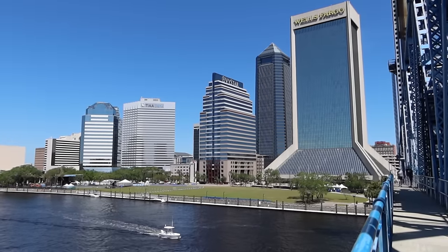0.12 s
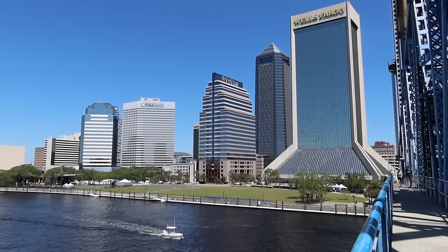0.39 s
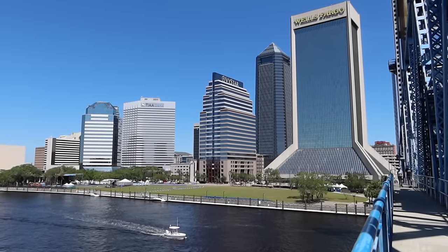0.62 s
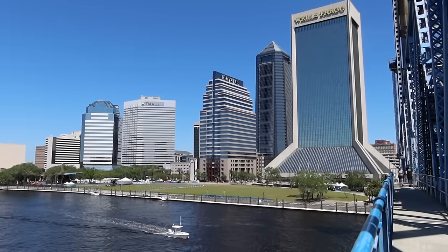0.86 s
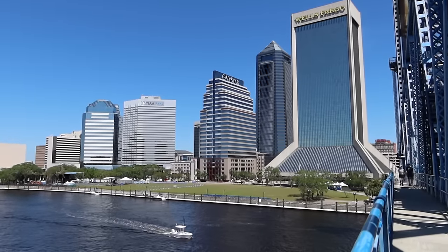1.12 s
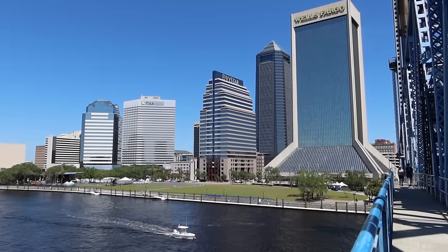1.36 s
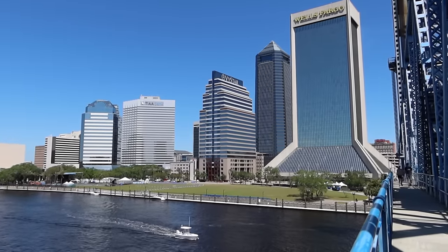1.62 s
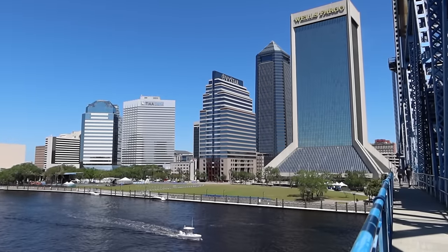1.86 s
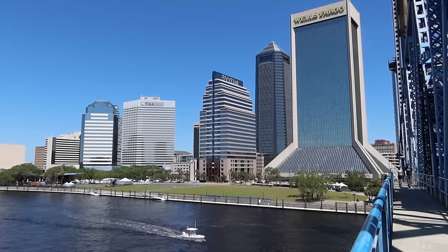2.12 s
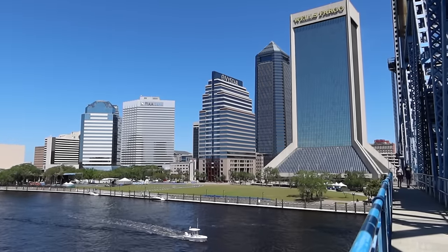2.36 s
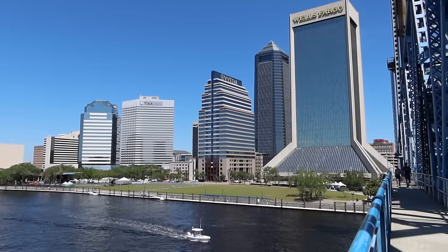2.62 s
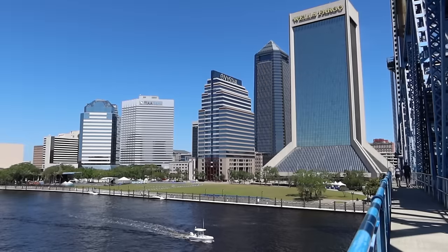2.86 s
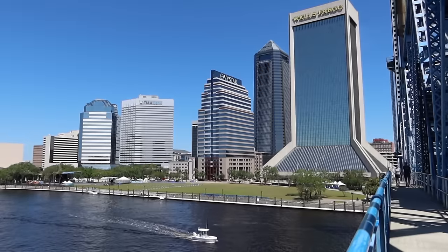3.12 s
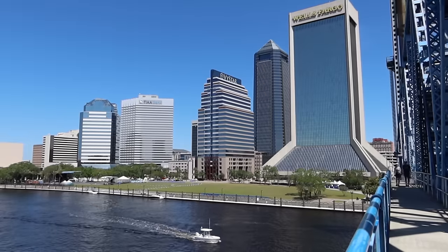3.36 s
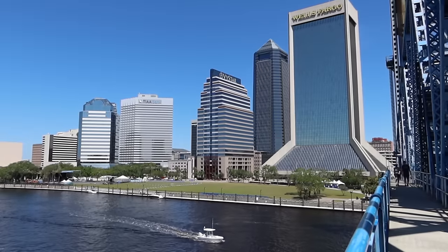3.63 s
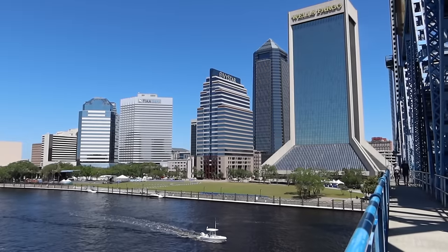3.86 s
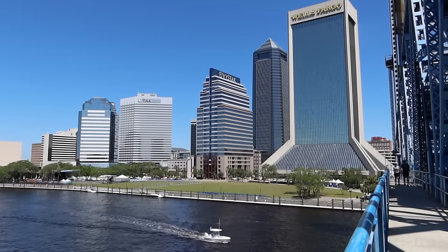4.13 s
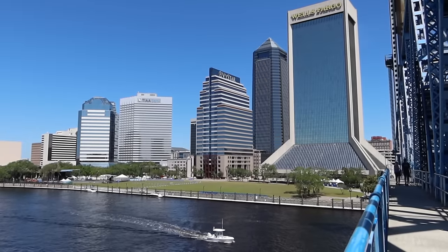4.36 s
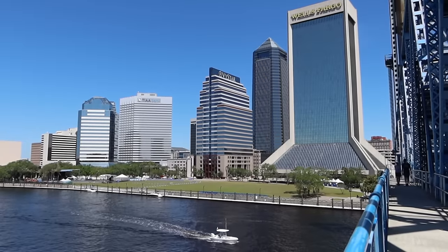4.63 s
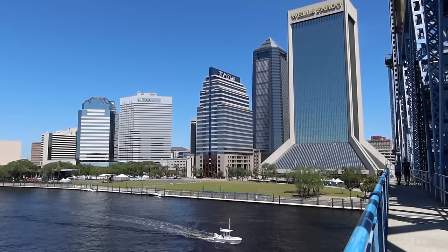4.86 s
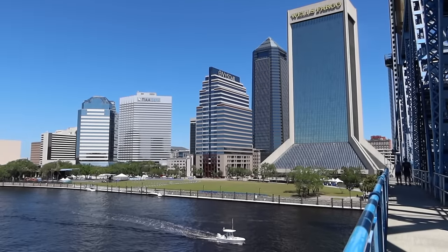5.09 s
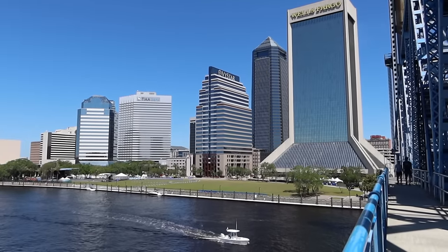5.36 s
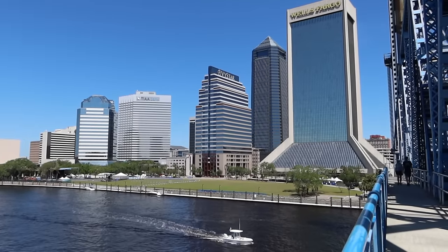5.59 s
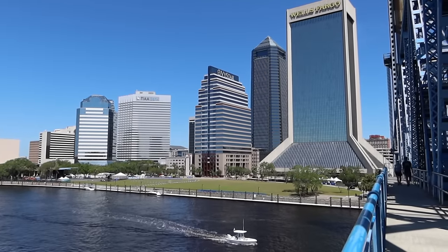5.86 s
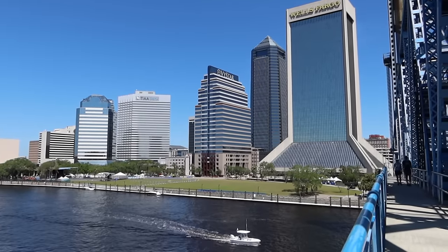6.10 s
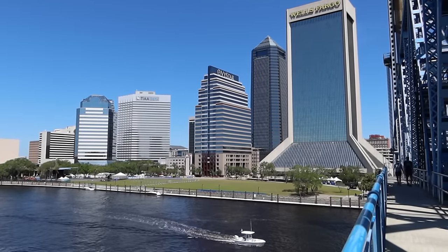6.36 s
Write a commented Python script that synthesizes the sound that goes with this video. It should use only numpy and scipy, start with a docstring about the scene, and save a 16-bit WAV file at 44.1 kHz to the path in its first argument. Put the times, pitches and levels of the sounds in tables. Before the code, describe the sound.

Blurred, beating low hum of tyres on a steel-grated bridge deck, surging and wavering over a dull boom, growl and soft road hiss.

```python
"""A blurred, beating hum stands out throughout, its strength rising and falling: traffic on the
steel grating of a river bridge, heard from the walkway.
Tyres crossing the bars sound multiples of the bar rate, as pairs of wavering tones.
Under the hum the deck booms, growls and roars, made of noise shaped in frequency and level.
Tread noise and hiss lie on top and, with the roar, swell as vehicles come near the microphone.
Brief hums at other pitches and two puffs of whistling hiss pass through."""
import sys
import numpy as np
from scipy import signal
from scipy.fft import rfft, irfft, next_fast_len
from scipy.io import wavfile
from scipy.ndimage import uniform_filter1d, map_coordinates

SR = 44100
rng = np.random.default_rng(int(sys.argv[2]) if len(sys.argv) > 2 else 0)


def unload_wav(signal):
    """Save mono or channel-first audio to the path in sys.argv[1] as 16-bit WAV at rate SR, clipped to [-1, 1]."""
    wavfile.write(
        sys.argv[1],
        SR,
        np.round(np.clip(np.atleast_2d(signal).T, -1, 1) * 32767).astype(np.int16),
    )


def to_linear_factor(level_db):
    """Convert decibel levels (scalar or array-like) to linear amplitude factors."""
    exponent = np.asarray(level_db, float) / 20
    return 10 ** exponent


N = 285768  # samples, 6.48 s


def unit(x):
    """Scales a signal to rms 1."""
    return x / np.sqrt(np.mean(x ** 2) + 1e-20)


def curves(rows):
    """Draws straight lines through the rows: one curve for each column after the time."""
    seconds, *columns = np.transpose(rows)
    t = np.arange(N) / SR
    return [np.interp(t, seconds, column) for column in columns]


def wobble(rate):
    """A smooth random curve through `rate` random knots a second."""
    knots = rng.standard_normal(int(N * rate / SR) + 4)
    return map_coordinates(knots, [np.arange(N) * rate / SR])


def rush(spectrum, patchy_db):
    """Noise of rms 1, coloured by the spectrum, whose gain varies in patches of time and frequency."""
    cells = signal.stft(rng.standard_normal(N + 1024), nperseg=1024)[2]
    patches = rng.standard_normal(cells.shape)
    patches = uniform_filter1d(patches, size=5, axis=0)  # along frequency
    patches = uniform_filter1d(patches, size=8, axis=1)  # along time
    patch_gain = to_linear_factor(patchy_db * unit(patches))
    noise = signal.istft(cells * patch_gain, nperseg=1024)[1][:N]

    length = next_fast_len(N + 8192)
    hz, db = np.transpose(spectrum)
    log_bins = np.log(np.fft.rfftfreq(length, 1 / SR) + 1)
    colour = to_linear_factor(np.interp(log_bins, np.log(hz + 1), db, -120, -120))  # near silence outside the rows
    return unit(irfft(rfft(noise, length) * colour, length)[:N])


def fuzzy(hz, spread_hz, flutter_db):
    """A tone of rms 1 from two axles that cross the bars out of step, so it blurs and beats."""
    axles = []
    for _ in range(2):
        level = to_linear_factor(flutter_db * wobble(18))
        cycles = np.cumsum(hz + spread_hz * wobble(12)) / SR
        axles.append(level * np.sin(2 * np.pi * cycles + rng.uniform(0, 2 * np.pi)))
    return unit(axles[0] + 0.38 * axles[1])


# The finest hiss, over the whole place. Each row: time in seconds, level in dB.
FINE_HISS_LEVEL = [(0, -72), (.6, -74), (1.3, -71), (2.35, -71), (2.8, -74), (3.8, -77.5), (4.5, -74),
                   (5, -74.5), (5.6, -72.5), (6, -70), (6.25, -67.5), (6.48, -65)]
# Its colour. Each row: frequency in Hz, relative density in dB per Hz.
FINE_HISS_COLOUR = [(5000, -23), (7000, -0.5), (8200, -5), (9500, -7.5), (11000, -11.5), (14500, -20.5),
                    (16000, -68)]


def fine_hiss():
    """The highest part of the traffic noise, patchy noise on a slowly moving level."""
    level_db, = curves(FINE_HISS_LEVEL)
    return to_linear_factor(level_db) * rush(FINE_HISS_COLOUR, patchy_db=3.0)


# The deck's own resonance. Each row: frequency in Hz, relative density in dB per Hz.
DECK_RING_COLOUR = [(140, -29.5), (158, -4), (166, 0), (175, -3.5), (195, -30.5)]


def deck_ring():
    """A resonance of the deck that rings throughout, as a narrow band of noise."""
    return to_linear_factor(-32) * rush(DECK_RING_COLOUR, patchy_db=0.5)


# The steel underfoot. Each row: time in seconds, boom level in dB, growl level in dB.
BOOM_GROWL_LEVEL = [(0, -25.5, -26), (.4, -25, -24.5), (1.0, -26.5, -26), (1.2, -24, -26),
                    (1.45, -21.5, -23.5), (1.8, -24.5, -23), (2.3, -22.5, -23), (3.0, -23, -25.5),
                    (3.3, -25, -26), (3.7, -25.5, -26.5), (4.5, -24.5, -30), (5.0, -24.5, -31.5),
                    (5.8, -25, -34.5), (6.0, -23, -29.5), (6.25, -25.5, -30), (6.48, -19.5, -26)]
# Level of the upper growl. Each row: time in seconds, level in dB.
UPPER_GROWL_LEVEL = [(0, -28), (.3, -32), (.7, -33.5), (1.3, -35), (1.6, -32.5), (2.0, -34.5), (2.5, -32.5),
                     (3.0, -35), (3.6, -36.5), (4.3, -38), (4.9, -42), (5.8, -40.5), (6.05, -35),
                     (6.3, -33), (6.48, -34.5)]
# Colours of boom, growl and upper growl. Each row: frequency in Hz, relative density in dB per Hz.
BOOM_COLOUR = [(12, -37.5), (24, -24), (33, -18), (42, -9), (60, -7.5), (85, -5), (125, 0), (146, -4),
               (180, -1.5), (260, -26)]
GROWL_COLOUR = [(330, -31.5), (430, -1), (520, -1.5), (620, -7.5), (800, -20.5), (1200, -45)]
UPPER_GROWL_COLOUR = [(500, -22), (600, 0), (720, 0), (900, -7), (1150, -25)]


def steelwork():
    """Random blows on the steelwork merge into a boom and two bands of growl."""
    boom_db, growl_db = curves(BOOM_GROWL_LEVEL)
    upper_db, = curves(UPPER_GROWL_LEVEL)
    boom = to_linear_factor(boom_db) * rush(BOOM_COLOUR, patchy_db=0.14)
    growl = to_linear_factor(growl_db + 0.66 * wobble(6)) * rush(GROWL_COLOUR, patchy_db=1.0)
    upper = to_linear_factor(upper_db) * rush(UPPER_GROWL_COLOUR, patchy_db=0.8)
    return boom + growl + upper


# Vehicles passing the walkway. Each row: closest moment in seconds, seconds to fall 3 dB,
# then deck roar, tread and hiss at that moment, in dB over the far traffic.
VEHICLE_PASSES = [(0.0, .5, 0, 1.5, 2), (1.55, 0.36, 5.5, 4, 6), (2.25, 0.38, 3, 7.5, 7),
                  (3.4, 0.2, 0.5, -8.5, -4), (4.3, 0.5, 0, -9.5, -9.5), (5.1, 0.47, -10, -1, -8),
                  (5.6, 0.26, -8, 4, -3.5), (6.3, 0.17, 1.5, 2.5, 2.5)]


def nearness_db():
    """Rise of roar, tread and hiss: each vehicle's power falls with its distance squared."""
    t = np.arange(N) / SR
    power = np.ones((3, N))  # the far traffic
    for closest, width, *peaks_db in VEHICLE_PASSES:
        peaks = to_linear_factor(peaks_db)[:, None] ** 2
        power += peaks / (1 + ((t - closest) / width) ** 2)
    return 10 * np.log10(power)


# Colours of deck roar, tread and hiss. Each row: frequency in Hz, relative density in dB per Hz.
ROAR_COLOUR = [(120, -29), (185, 1), (210, -1.5), (245, 0.5), (285, -1.5), (330, 1), (420, -4), (520, -15),
               (650, -35)]
TREAD_COLOUR = [(500, -17.5), (800, -1.5), (1050, 0), (1300, -5.5), (1600, -9), (1900, -11.5), (2600, -24),
                (3500, -47.5)]
HISS_COLOUR = [(1500, -18), (2300, -1), (3200, -5), (4500, -12), (6000, -20), (8000, -35), (10000, -61)]


def passing_traffic():
    """Blows on the deck and rolling treads merge into broad noises that swell with nearness."""
    far_roar_db, far_tread_db, far_hiss_db = -25, -39, -53.5
    roar_rise, tread_rise, hiss_rise = nearness_db()
    roar = to_linear_factor(far_roar_db + roar_rise) * rush(ROAR_COLOUR, patchy_db=0.36)
    tread_db = far_tread_db + tread_rise + 0.65 * wobble(7)
    tread = to_linear_factor(tread_db) * rush(TREAD_COLOUR, patchy_db=1.15)
    hiss = to_linear_factor(far_hiss_db + hiss_rise) * rush(HISS_COLOUR, patchy_db=1.6)
    return roar + tread + hiss


# Brief hisses off the roadway. Each row: time of the peak in seconds, peak level of the broad hiss
# in dB, seconds from the peak to 1/e of its amplitude, whistle frequency in Hz.
ROAD_PUFFS = [(1.078, -55, .018, 5000), (1.316, -58, .025, 5050)]


def puffs():
    """Short bursts of hiss from the roadway, each with a blurred whistle (a narrow band of noise)."""
    t = np.arange(N) / SR
    broad = rush([(2500, -13), (3500, -6), (5000, -4), (7500, -15), (12000, -39.5)], patchy_db=1.5)
    total = np.zeros(N)
    for peak, db, length, hz in ROAD_PUFFS:
        swell = to_linear_factor(db) * np.exp(-((t - peak) / length) ** 2)
        whistle = rush([(hz - 450, -25), (hz, 0), (hz + 450, -25)], patchy_db=1.5)
        total += swell * (broad + 0.6 * whistle)
    return total


# Short hums, probably of vehicles at other speeds. Each row: time of the peak in seconds,
# pitch in Hz, peak level in dB, seconds from the peak to 1/e of its amplitude.
BRIEF_HUMS = [(1.645, 335, -26, 0.12), (2.0, 368.4, -25, 0.13), (2.05, 504, -29, 0.18),
              (2.2, 415.5, -27.5, 0.18), (4.302, 385.6, -28.5, .25), (4.548, 130, -28.5, 0.18),
              (4.749, 319, -29.5, 0.14), (5.1, 129.2, -34.5, 0.36), (6.203, 130.4, -26, .2),
              (6.303, 323.4, -32, 0.25)]


def brief_hums():
    """Blurred tones at other pitches that swell and fade."""
    t = np.arange(N) / SR
    total = np.zeros(N)
    for peak, hz, db, length in BRIEF_HUMS:
        swell = to_linear_factor(db) * np.exp(-((t - peak) / length) ** 2)
        total += swell * fuzzy(hz, spread_hz=4, flutter_db=1.5)
    return total


# Tyres on the grating. Each row: time in seconds, bars crossed per second in Hz.
BAR_RATE = [(0, 81.9), (1.2, 82.74), (2, 83.94), (2.6, 82.74), (3.5, 82.56), (4.6, 81.2), (5.3, 80.1),
            (6, 78.75), (6.48, 80.1)]
# Hum at twice the bar rate. Each row: time in seconds, level in dB.
SECOND_LEVEL = [(0, -24.5), (.3, -26), (.55, -27), (.66, -31), (.76, -21), (1.12, -24.5), (1.21, -17.5),
                (1.44, -17), (1.56, -31.5), (1.66, -18.5), (1.93, -25.5), (2.08, -20.5), (2.32, -20),
                (2.44, -30), (2.49, -15.5), (2.66, -17.5), (3.14, -27), (3.25, -17), (3.32, -23.5),
                (3.5, -20), (3.57, -30), (3.65, -28), (4.02, -23), (4.09, -40), (4.15, -23.5), (4.3, -29),
                (4.5, -22), (4.62, -23.5), (4.8, -31.5), (5.0, -26.5), (5.15, -26), (5.32, -23.5),
                (5.58, -40.5), (5.76, -19), (5.84, -34), (6.03, -19.5), (6.15, -27), (6.26, -22),
                (6.48, -29)]
# Hum at three times the bar rate. Each row: time in seconds, level in dB.
THIRD_LEVEL = [(0, -19.5), (.12, -24.5), (.3, -26.5), (1.0, -24), (1.13, -39), (1.4, -27), (1.65, -20),
               (1.8, -26.5), (2.25, -34), (2.5, -24), (3.2, -25), (3.5, -29), (3.9, -24), (4.15, -34),
               (4.4, -26), (4.7, -33), (5.5, -38.5), (5.9, -34), (6.04, -24), (6.13, -26), (6.2, -34),
               (6.28, -32), (6.48, -26)]


def grating():
    """Multiples of the bar rate: the deck favours the 2nd and 3rd, the 1st and 4th follow weakly."""
    rate, = curves(BAR_RATE)
    second_db, = curves(SECOND_LEVEL)
    third_db, = curves(THIRD_LEVEL)
    first = to_linear_factor(second_db - 14.5) * fuzzy(rate, spread_hz=3, flutter_db=6.0)
    second = to_linear_factor(second_db) * fuzzy(2 * rate, spread_hz=3.5, flutter_db=2.2)
    third = to_linear_factor(third_db) * fuzzy(3 * rate, spread_hz=8, flutter_db=2.5)
    fourth = to_linear_factor(third_db - 13) * fuzzy(4 * rate, spread_hz=9, flutter_db=4.5)
    return first + second + third + fourth


def scene():
    """Everything reaches one microphone on the walkway."""
    background = fine_hiss() + deck_ring() + steelwork()
    vehicles = passing_traffic() + puffs() + brief_hums() + grating()
    return (background + vehicles)[None]  # one channel


def top_cut(x):
    """Nothing passes above the cut-off."""
    return signal.sosfilt(signal.butter(12, 14500, fs=SR, output="sos"), x)


def record(dry):
    """The microphone's mix goes to the recorder at its own level."""
    return top_cut(dry)


dry = scene()
out = record(dry)
unload_wav(out)
```